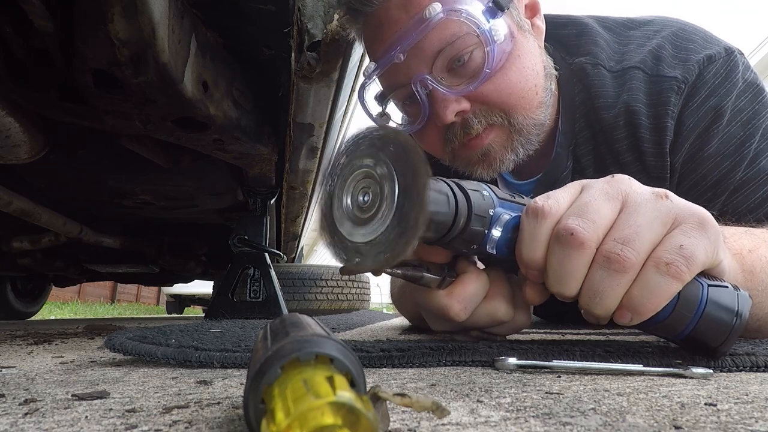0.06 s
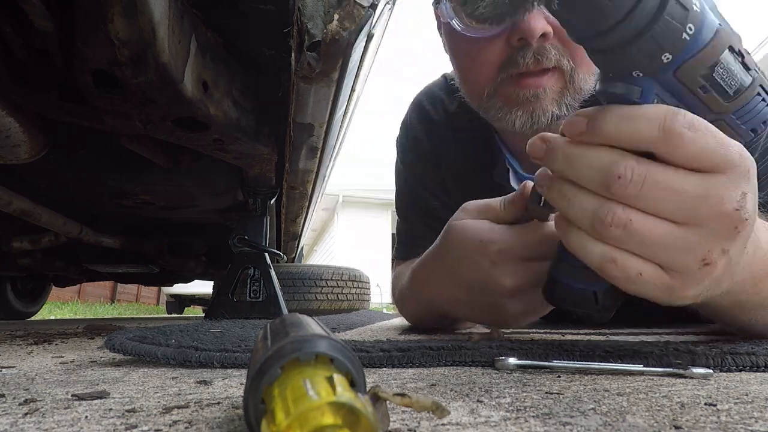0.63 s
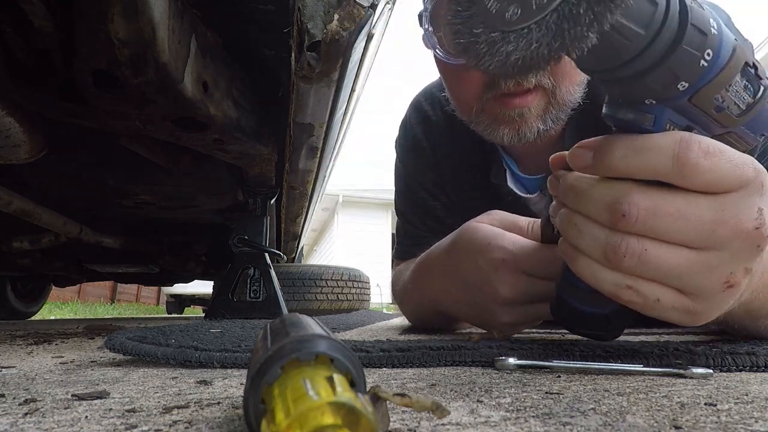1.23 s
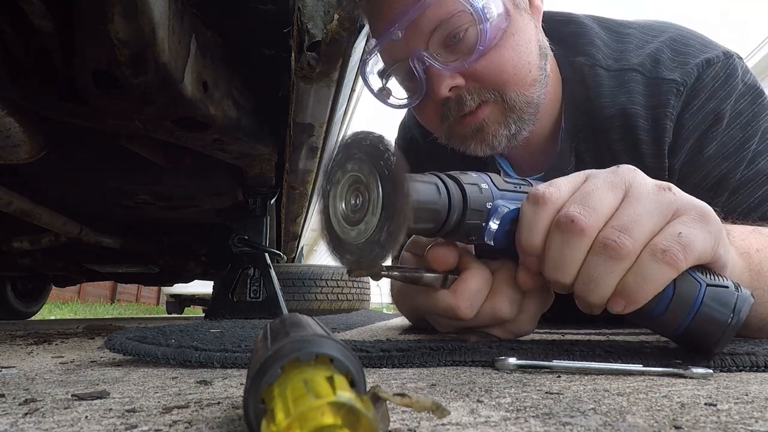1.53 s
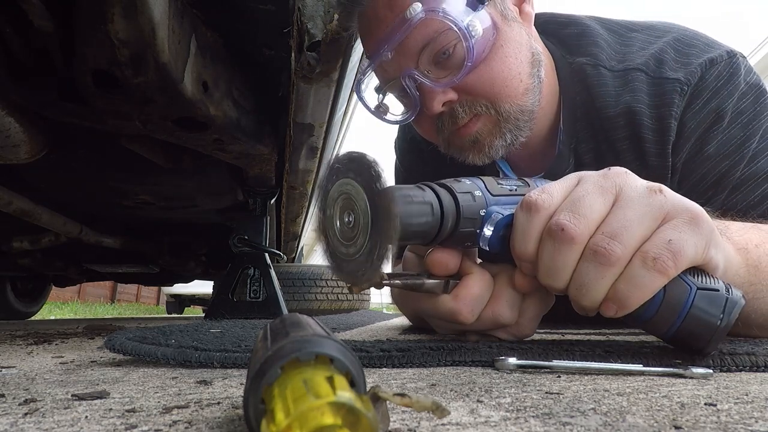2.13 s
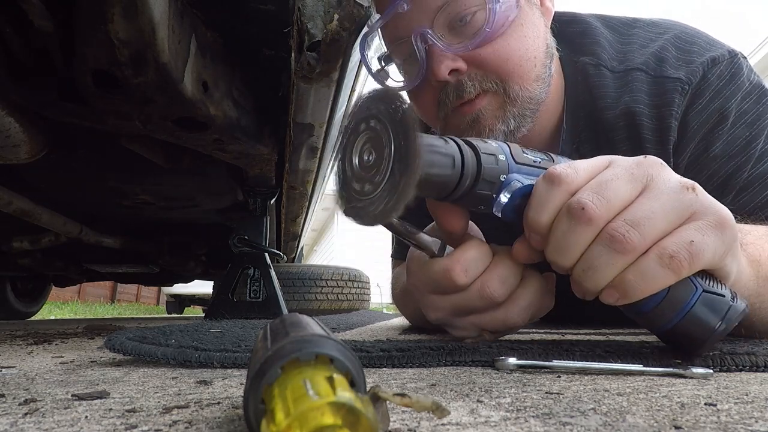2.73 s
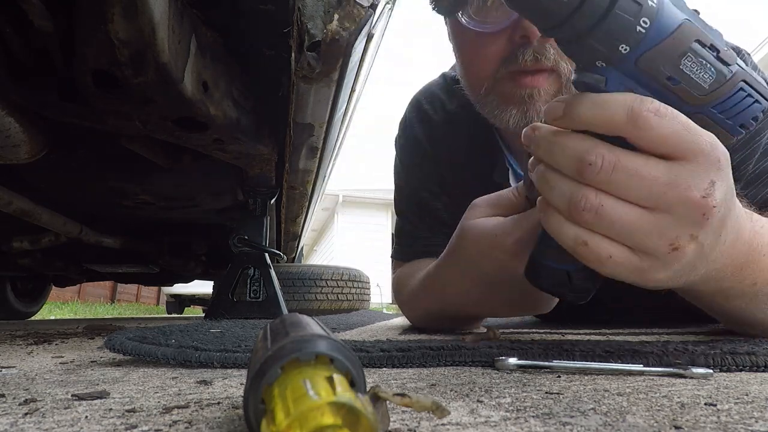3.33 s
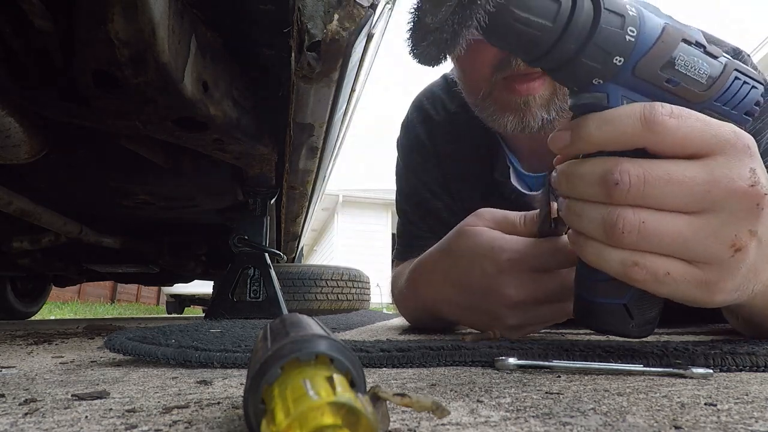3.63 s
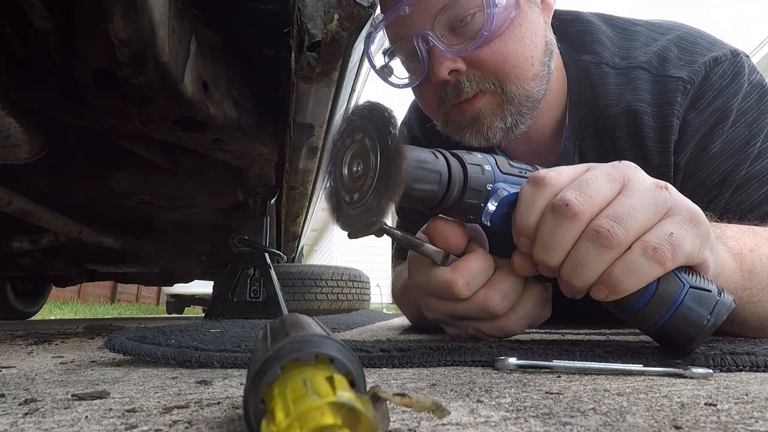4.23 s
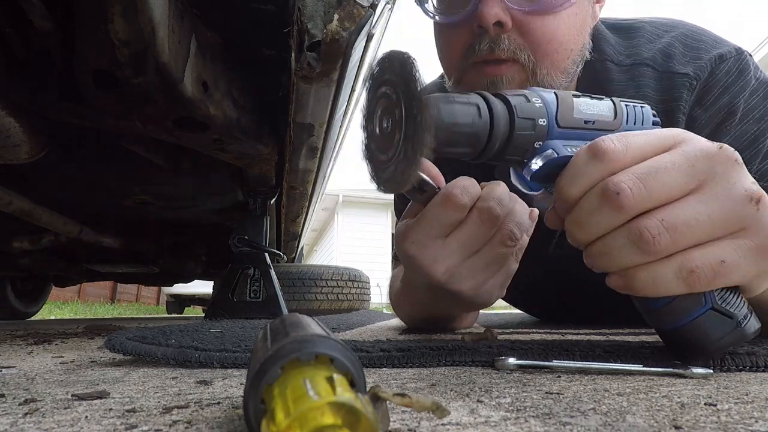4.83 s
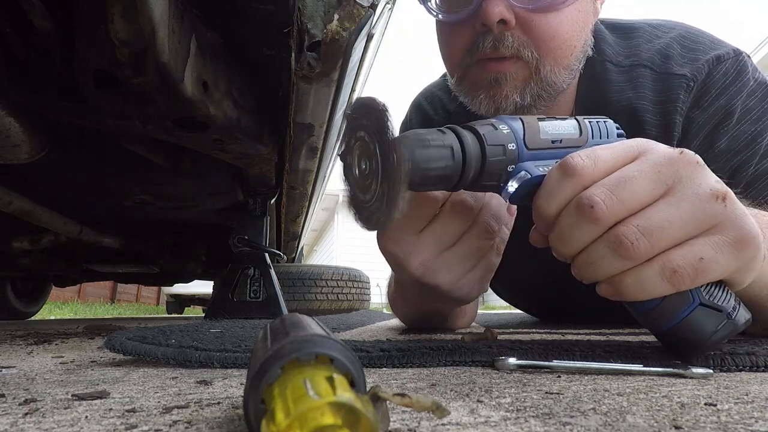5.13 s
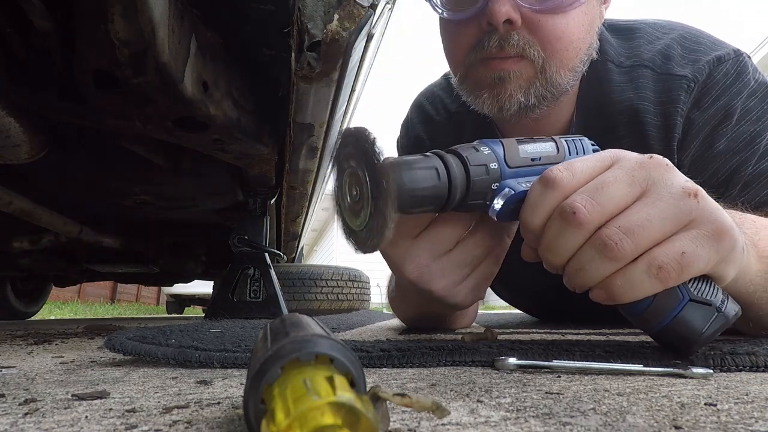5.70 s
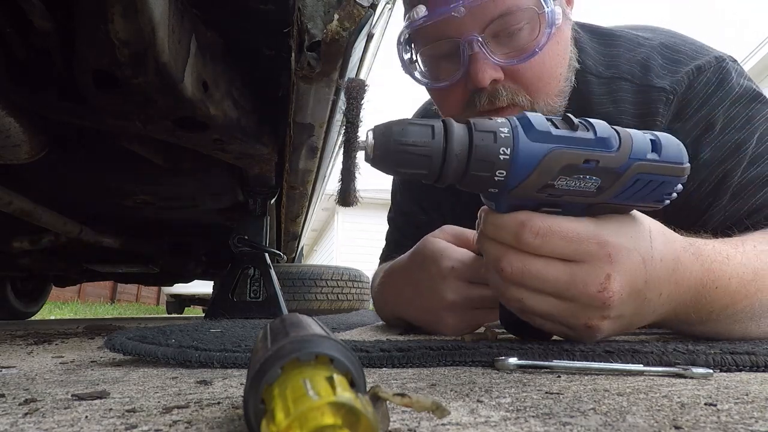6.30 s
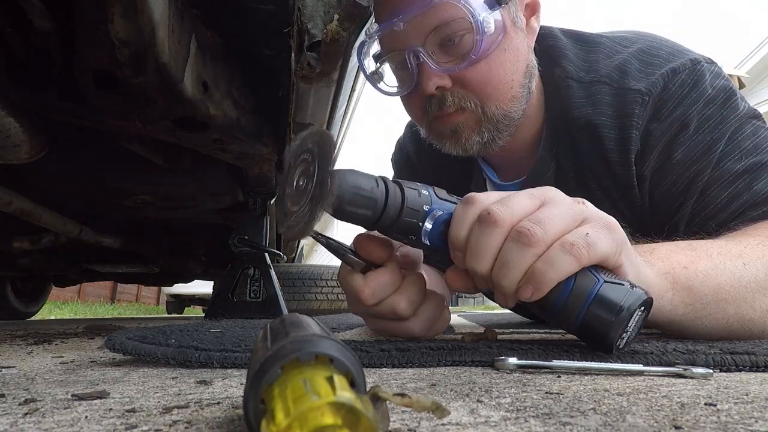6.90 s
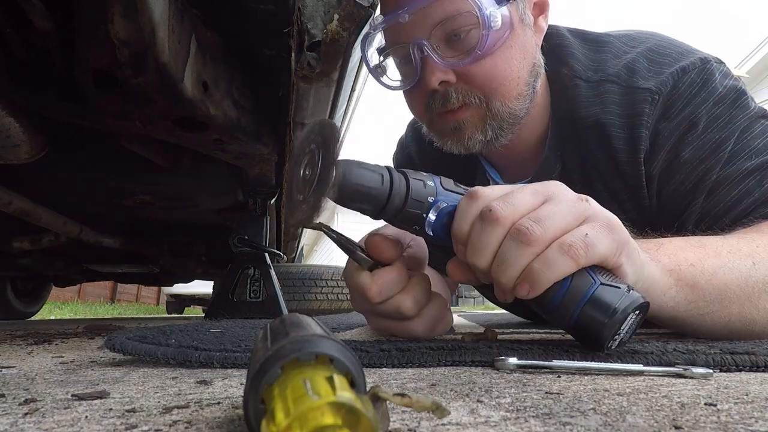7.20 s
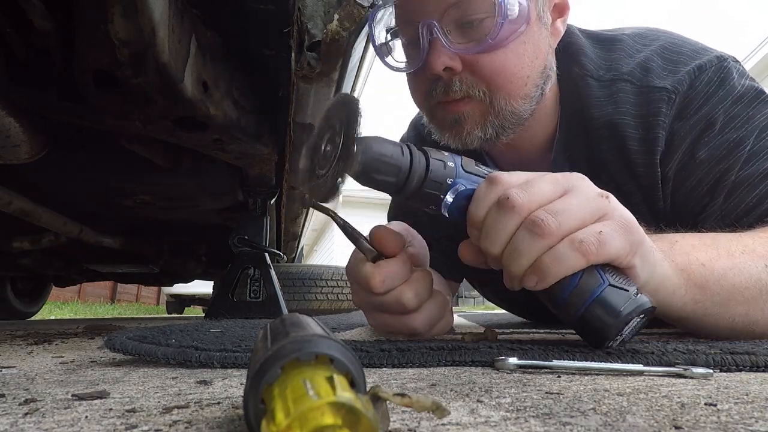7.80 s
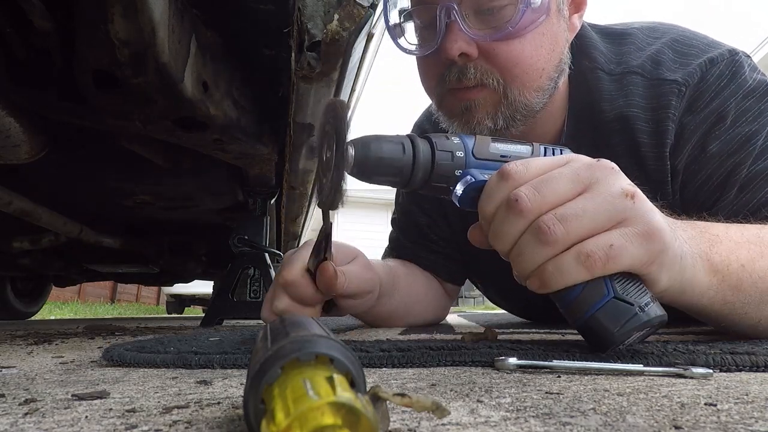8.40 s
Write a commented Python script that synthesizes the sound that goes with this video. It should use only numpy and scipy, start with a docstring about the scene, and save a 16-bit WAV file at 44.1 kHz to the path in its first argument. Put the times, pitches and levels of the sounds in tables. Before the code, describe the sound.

A cordless drill is already running close by, its motor whining high and its gears rattling as a wire wheel scrubs a rusty bolt. It stops with a short chirp, then runs in four more bursts of about a second each. In a longer pause, tools click and a hand squeaks on the rubber grip, and then a final, longer burst follows. Faint outdoor hiss and distant birds lie underneath.

```python
"""A cordless drill spins a wire wheel against rusty bolts on a garage floor, in six bursts over outdoor air.
It is already running: the motor whines on shaft multiples, gears rattle, wire tips scrub. At 0.5 s
the brake stops it with a chirp; bristles shiver, tools click, far birds call. Four more bursts
follow, the bolt squealing at 1.9 s. Near 6 s the hands shift and the rubber grip squeaks.
The last burst runs from 6.8 s to the end, its pinion tone swelling near 7.6 s."""
import sys
import numpy as np
from scipy import signal
from scipy.fft import rfft, irfft, next_fast_len
from scipy.io import wavfile
from scipy.ndimage import uniform_filter1d

SR = 44100
rng = np.random.default_rng(int(sys.argv[2]) if len(sys.argv) > 2 else 0)


def bounce(signal):
    """Save signal as a 16-bit WAV file at the path given by the first command-line argument."""
    frames = np.transpose(np.atleast_2d(signal))
    limited = np.clip(frames, -1, 1)
    pcm = np.round(limited * 32767).astype(np.int16)
    wavfile.write(sys.argv[1], SR, pcm)


N = 377055
T = np.arange(N) / SR


def undb(db):
    return 10 ** (np.asarray(db) / 20)


def unit_rms(x):
    return x / np.sqrt(np.mean(x ** 2))


def noise():
    return rng.standard_normal(N)


def walk(rate_hz):
    """Random steps, smoothed twice; rms 1."""
    hold = max(int(SR / rate_hz), 1)
    steps = np.repeat(rng.standard_normal(N // hold + 1), hold)
    return unit_rms(uniform_filter1d(uniform_filter1d(steps, hold), hold)[:N])


def colour(x, points):
    """Shape the spectrum by (freq_hz, gain_db) rows; rms 1."""
    hz, db = np.transpose(points)
    size = next_fast_len(N)
    bins_hz = np.maximum(np.fft.rfftfreq(size, 1 / SR), 1)
    gain = undb(np.interp(np.log(bins_hz), np.log(hz), db))
    return unit_rms(irfft(rfft(x, size) * gain, size)[:N])


def ring(x, hz, width_hz):
    """One resonance, gain 1 at its centre."""
    return signal.lfilter(*signal.iirpeak(hz, hz / min(width_hz, SR / 4), fs=SR), x)


def ring_twice(x, hz, width_hz):
    return ring(ring(x, hz, width_hz), hz, width_hz)


def band(hz, width_hz):
    """Noise band; rms 1."""
    return unit_rms(ring_twice(noise(), hz, width_hz))


def swell(start_s, end_s):
    """Half-sine arch, peak 1."""
    return np.sin(np.pi * np.clip((T - start_s) / (end_s - start_s), 0, 1))


def curve(points):
    """Straight lines through (time_s, value) rows."""
    return np.interp(T, *np.transpose(points))


# spectra of the background hiss and of low noise that fades out at the start: freq_hz, gain_db
HISS_SPECTRUM = [(25, -44), (100, -32), (180, -26), (320, -21.5), (570, -31), (660, 1), (780, 2),
                 (1100, -2), (1600, -7.5), (3000, -12.5), (6000, -18), (9000, -25.5), (13000, -28),
                 (16000, -35)]
LOW_NOISE_SPECTRUM = [(25, -22), (100, -9), (200, 3), (330, 2), (550, 0), (800, -36)]


def background(hiss_db=-52.5, low_db=-55, low_fade_s=.2):
    """Background hiss, restless near 800 Hz; low noise fades out at the start."""
    hiss = colour(noise(), HISS_SPECTRUM) * undb(hiss_db + .5 * walk(5.5))
    restless = band(794, 203) * undb(-65.5 + 4.7 * walk(14))
    low_noise = colour(noise(), LOW_NOISE_SPECTRUM) * undb(low_db) * np.exp(-T / low_fade_s)
    return hiss + restless + low_noise


# bird calls: start_s, end_s, pitch_hz, width_hz, level_db
BIRD_CALLS = [(.49, .71, 2900, 200, -60.5), (.5, .85, 1960, 90, -62), (1.15, 1.26, 2250, 200, -62.5),
              (1.2, 1.41, 1956, 80, -57), (1.378, 1.524, 2180, 120, -57.5), (6.08, 6.2, 1950, 80, -60),
              (6.42, 6.8, 1930, 80, -63)]


def birds():
    """Far calls, smeared by distance into narrow bands."""
    return sum(undb(db) * swell(start, end) * band(hz, width) for start, end, hz, width, db in BIRD_CALLS)


# shakes of the stopped wheel: start_s, end_s, level_db
SHIVERS = [(.47, 0.576, -60), (.7, .89, -65), (1.2, 1.35, -68), (3.198, 3.346, -56.5), (3.45, 3.64, -65),
           (3.712, 3.886, -59), (4.72, 4.823, -62), (6.49, 6.602, -62)]
# wire resonances: freq_hz, width_hz, gain_db
BRISTLE_MODES = [(6670, 1300, -1.5), (8600, 1700, -5)]


def bristles():
    """Loose wires ring near two pitches as the wheel is moved."""
    shaking = sum(undb(db) * swell(start, end) for start, end, db in SHIVERS)
    return shaking * sum(undb(db) * band(hz, width) for hz, width, db in BRISTLE_MODES)


def stick_slip(glide, partials):
    """Slightly rough gliding tone."""
    time_s, pitch_hz, level_db = np.transpose(glide)
    envelope = np.interp(T, time_s, undb(level_db), left=0, right=0) * undb(1.3 * walk(500))
    phase = 2 * np.pi * np.cumsum(np.interp(T, time_s, pitch_hz)) / SR
    return np.sqrt(2) * envelope * sum(undb(db) * np.sin(k * phase) for k, db in partials)


# hand slides: start_s, peak_s, end_s, level_db
RUBS = [(5.87, 5.92, 5.945, -53), (6.125, 6.165, 6.2, -45), (6.279, 6.297, 6.43, -40)]
# skin on rubber: freq_hz, gain_db
RUB_SPECTRUM = [(600, -24), (1000, 4.5), (2200, -4), (4200, 1.5), (5700, -6.5), (7000, -4), (8800, -18),
                (10500, -9.5), (12000, -14), (14000, -22), (16000, -32)]
# rubber squeak: time_s, pitch_hz, level_db
GRIP_SQUEAK = [(6.283, 1630, -55), (6.288, 1325, -29), (6.292, 1150, -20), (6.296, 1020, -29),
               (6.303, 960, -35), (6.32, 940, -58)]
# hiss with the squeak: start_s, end_s, centre_hz, width_hz, level_db
SQUEAK_HISS = (6.281, 6.335, 11200, 3500, -45)


def grip():
    """Skin slides on the rubber grip: grainy rubs and one falling squeak."""
    sliding = sum(undb(db) * np.interp(T, [start, peak, end], [0, 1, 0]) for start, peak, end, db in RUBS)
    start_s, end_s, centre_hz, width_hz, level_db = SQUEAK_HISS
    hiss = undb(level_db) * swell(start_s, end_s) * band(centre_hz, width_hz)
    grain = colour(noise() * undb(1.7 * walk(900)), RUB_SPECTRUM)
    return grain * sliding + hiss + stick_slip(GRIP_SQUEAK, [(1, 0)])


# knocks of pliers and bolt: start_s, peak_db, ring_hz, width_hz, decay_s
TOOL_CLICKS = [(.9305, -32, 9500, 7000, .0025), (.933, -32, 1600, 1700, .003),
               (.9835, -41, 3600, 2000, .001), (1.385, -46, 9000, 7000, .002),
               (2.536, -31, 1100, 500, .0015), (4.9175, -17.5, 1480, 1050, .0011),
               (6.179, -34, 2600, 2500, .0015), (6.2017, -26, 3300, 2100, .001),
               (6.279, -31.5, 3100, 2200, .005), (6.6632, -45, 5500, 4000, .0015),
               (6.744, -32.5, 4800, 4000, .001)]


def knocks(events):
    """Each is decaying noise through one broad resonance, cut off at 0.1 s."""
    out = np.zeros(N)
    t = T[:SR // 10]
    for start_s, peak_db, ring_hz, width_hz, decay_s in events:
        crack = ring_twice(rng.standard_normal(len(t)) * np.exp(-t / decay_s), ring_hz, width_hz)
        i = int(start_s * SR)
        out[i:i + len(t)] += undb(peak_db) * crack / np.abs(crack).max()
    return out


# bolt squeal: time_s, fundamental_hz, level_db
BOLT_SQUEAL = [(1.915, 455, -55), (1.93, 452, -37.5), (1.945, 427, -38), (1.962, 405, -43),
               (1.98, 388, -56)]
# its overtones: multiple, gain_db
SQUEAL_PARTIALS = [(2, -5), (3, -1.5)]


def bolt_squeal():
    """The bolt sticks and slips on the wires; only overtones sound."""
    return stick_slip(BOLT_SQUEAL, SQUEAL_PARTIALS)


# trigger pulls, with level offsets from how the drill is held:
# on_s, brake_s, rattle_db, scrub_db, sizzle_db, whistle_db, sizzle_to_scrub_db_per_s
PULLS = [(-.2, .482, -0.4, 1.5, 2.9, 0, -0.5), (1.514, 2.373, 0.54, -.6, 3, 0, 1),
         (2.516, 3.222, -0.1, .5, -3.8, 0, 1), (3.854, 4.562, 0.4, -0.5, 1.5, 0, 1),
         (4.803, 5.826, .4, 1.0, 0.5, 10.5, 0.5), (6.814, 8.9, .3, -.3, -3.9, -3, 1.8)]


def motion(inertia_s=.0012, spin_up_s=.0075, ease_s=.023, ease_depth=.14, brake_decay_s=.0062,
           start_strain_s=.014, brake_strain_s=.011, attack_s=.0054, coast_s=.009):
    """Share of full speed, motor strain and loudness envelope as the trigger is pulled and let go."""
    speed, strain, envelope = np.zeros((3, N))
    for on_s, brake_s, *_ in PULLS:
        running_s, braking_s = np.maximum(T - on_s, 0), np.maximum(T - brake_s, 0)
        rise = 1 - np.exp(-np.maximum(running_s - inertia_s, 0) / spin_up_s)
        easing = 1 - ease_depth * np.clip((T - brake_s) / ease_s + 1, 0, 1) ** 1.5
        speed += rise * easing * np.exp(-(braking_s / brake_decay_s) ** 2)
        # current peaks at spin-up and at braking
        strain += (T > on_s) * np.exp(-running_s / start_strain_s)
        strain += .85 * (T > brake_s) * np.exp(-braking_s / brake_strain_s)
        envelope += (1 - np.exp(-running_s / attack_s)) * np.exp(-(braking_s / coast_s) ** 2.6)
    return speed, strain, envelope


def hiss_puffs(delay_s=.5, peak_db=-26, centre_hz=4500, width_hz=4000, decay_s=1.2):
    """A nearly level 0.1 s hiss partway into each burst."""
    return knocks([(on_s + delay_s, peak_db, centre_hz, width_hz, decay_s) for on_s, *_ in PULLS])


# shaft speed, one list a burst: time_s, shaft_hz
SHAFT_SPEEDS = [
    [(0.02, 553), (0.14, 548), (0.27, 548.7), (0.32, 557), (0.45, 560)],
    [(1.57, 559.4), (1.66, 553), (1.85, 550.5), (2.09, 545.5), (2.31, 551.5), (2.34, 557.1)],
    [(2.57, 558), (2.99, 553.2), (3.05, 556.5), (3.15, 551.3), (3.19, 555)],
    [(3.91, 556.3), (4.02, 556.7), (4.14, 542.9), (4.3, 552.4), (4.37, 545), (4.43, 553.6), (4.48, 547),
     (4.51, 557.7), (4.53, 546)],
    [(4.87, 558.3), (5.7, 555.8), (5.79, 557.8)],
    [(6.87, 558.4), (7.14, 545), (7.44, 557), (7.61, 552), (7.73, 552.7), (7.81, 558), (7.98, 555),
     (8.13, 557.7), (8.53, 556.0)],
]


def loaded_shaft_hz():
    """The shaft slows as the wheel is pressed on the bolt."""
    return curve(np.vstack(SHAFT_SPEEDS))


# pinion tone, order 9, near 5 kHz: time_s, level_db
PINION_LEVEL = [(.3, -40.5), (2.55, -41), (3.0, -37.5), (4.5, -41.5), (4.93, -52), (5.08, -43.5),
                (5.75, -39), (6.93, -45), (7.08, -41), (7.44, -37.5), (7.58, -30.5), (7.78, -32),
                (7.9, -37), (8.25, -41)]


def holding_offsets_db(sings_above_db=-37.5, sizzle_yield=.6):
    """The hold colours each burst; the sizzle gives way when the pinion sings."""
    pulls = np.array(PULLS)
    current = pulls[np.searchsorted(pulls[:, 0], T) - 1]
    on_s, brake_s, rattle_db, scrub_db, sizzle_db, whistle_db, shift_db_per_s = current.T
    shift_db = shift_db_per_s * (T - (on_s + brake_s) / 2)
    singing_db = np.maximum(curve(PINION_LEVEL) - sings_above_db, 0)
    return {"rattle": rattle_db, "scrub": scrub_db + shift_db, "whistle": whistle_db,
            "sizzle": sizzle_db - shift_db - sizzle_yield * singing_db, "pinion": singing_db}


# gear rattle, wire scrub and tip sizzle spectra: freq_hz, gain_db
RATTLE_SPECTRUM = [(560, -74), (680, -17.5), (1000, -12), (1350, -5), (1850, -4.5), (2100, -7),
                   (2900, -4.5), (3500, 0.5), (4300, -1.5), (5400, -4), (6000, -4), (7000, -3.5),
                   (9000, -13.5), (13300, -11.5), (15500, -19)]
SCRUB_SPECTRUM = [(3000, -34), (5500, -12.5), (6100, -8.5), (7000, -4), (7600, -4.5), (8500, 0.5),
                  (9700, -2.5), (11500, -2.5), (12400, -10), (13200, -23), (16000, -40)]
SIZZLE_SPECTRUM = [(10500, -30), (12600, 3), (13800, 3), (14800, -8), (15400, -10), (16000, -19)]
# gearbox and wheel resonances: freq_hz, width_hz, gain_db
SHELL_MODES = [(3680, 87, -13), (4810, 240, -8.5), (5600, 160, -24), (7090, 160, -4), (7940, 140, -3.5),
               (8540, 160, -3), (9250, 260, -9)]


def brushing(shaft_hz, offsets_db, rattle_db=-34, scrub_db=-36.5, sizzle_db=-44, gear_ratio=24):
    """Gear rattle and a hail of wire tips swell slightly once a wheel turn and ring the shell."""
    wobble = 1 + .022 * np.sin(2 * np.pi * np.cumsum(shaft_hz / gear_ratio) / SR)
    tips = noise() * (rng.random(N) < .45)
    rattle = colour(noise(), RATTLE_SPECTRUM) * undb(rattle_db + offsets_db["rattle"] + .22 * walk(200))
    scrub = colour(tips, SCRUB_SPECTRUM) * undb(scrub_db + offsets_db["scrub"] + .26 * walk(150))
    sizzle = colour(noise(), SIZZLE_SPECTRUM) * undb(sizzle_db + offsets_db["sizzle"])
    direct = (rattle + scrub + sizzle) * wobble
    return direct + sum(undb(db) * ring(direct, hz, width) for hz, width, db in SHELL_MODES)


# order 6 tone, near 3.3 kHz: time_s, level_db
SIXTH_LEVEL = [(.2, -43.5), (.35, -52), (1.8, -42.5), (2.35, -44), (2.6, -47.5), (3.2, -46.5), (4.0, -43.5),
               (4.5, -42.5), (4.9, -47.5), (5.8, -46), (6.9, -39), (8.5, -38.5)]
# motor and gear tones: order, level_db, db_per_sag_hz, partner, db_per_partner_db
SHAFT_TONES = [(3, -33.8, -.1, "pinion", -0.6), (4.002, -60, 0, "scrub", 1.5),
               (10, -48.5, -.8, "scrub", 1.6), (12, -40.2, -.3, "sizzle", -.3),
               (15, -47.3, -.6, "scrub", 1.6), (18, -44.3, -1, "scrub", 3.5), (21, -56.5, 0, "scrub", -4),
               (22, -56.5, .6, "sizzle", .15), (24, -53.5, .15, "rattle", 1.5),
               (25, -57.5, -.1, "whistle", 1), (27, -49.5, -.05, "sizzle", 1.35),
               (28, -68, .7, "sizzle", 2.5)]


def tone_levels(shaft_hz, offsets_db, no_load_hz=561, wander_db=1.3, wander_hz=4.3):
    """(order, level_db) pairs; all but 6 and 9 follow load and a partner, and drift as the hand moves."""
    sag_hz = no_load_hz - shaft_hz
    tones = [(6, curve(SIXTH_LEVEL)), (9, curve(PINION_LEVEL))]
    for order, level_db, db_per_sag_hz, partner, coupling in SHAFT_TONES:
        drift_db = wander_db * min(order / 10, 1) * walk(wander_hz)
        loaded_db = level_db + db_per_sag_hz * sag_hz + coupling * offsets_db[partner]
        tones.append((round(order), loaded_db + drift_db))
    return tones


def whine(shaft_hz, speed, strain, envelope, tones, chirp_db=-17.8, chirp_hz=3420, chirp_width_hz=1400):
    """Shaft-locked tones; under strain, order 9 chirps as it sweeps through the gearbox resonance."""
    hunting = 1 + .0006 * walk(60) + .0007 * walk(18)
    angle = 2 * np.pi * np.cumsum(shaft_hz * speed * hunting) / SR
    tonal = np.zeros(N)
    for order, level_db in tones:
        # high orders depend on how the teeth sit, so flutter more
        flutter_db = min(.16 * order, 2) * (.5 * walk(11) + .69 * walk(70))
        tonal += undb(level_db + flutter_db) * np.sin(order * angle)
    mesh = strain * np.sin(9 * angle) * undb(2.5 * walk(900))
    chirp = undb(chirp_db) * ring_twice(mesh, chirp_hz, chirp_width_hz)
    return np.sqrt(2) * tonal * envelope * np.clip(speed, 0, 1) ** 2 + chirp


def drill():
    """One shaft drives both the whine and the brushing."""
    shaft_hz = loaded_shaft_hz()
    speed, strain, envelope = motion()
    offsets_db = holding_offsets_db()
    brush = envelope * brushing(shaft_hz, offsets_db)
    return brush + whine(shaft_hz, speed, strain, envelope, tone_levels(shaft_hz, offsets_db))


def scene():
    """Drill and handling over birds and background hiss, the same in both channels."""
    near = drill() + knocks(TOOL_CLICKS) + hiss_puffs() + grip() + bristles() + bolt_squeal()
    # steep high-pass at 640 Hz; the near sounds have almost no bass
    near = signal.sosfilt(signal.butter(8, 640, "high", fs=SR, output="sos"), near)
    return np.tile(near + birds() + background(), (2, 1))


def record(dry):
    """Steep low-pass at 15.7 kHz."""
    return signal.sosfilt(signal.ellip(10, .2, 80, 15700, fs=SR, output="sos"), dry)


dry = scene()
out = record(dry)
bounce(out)
```